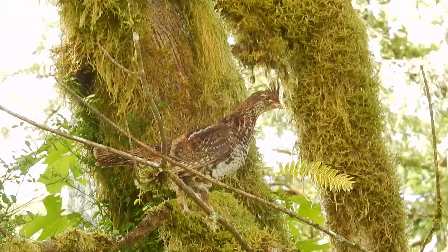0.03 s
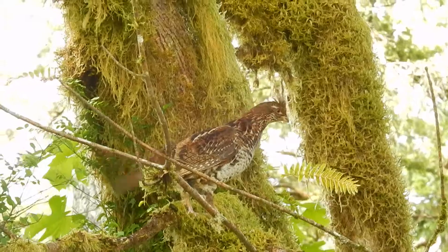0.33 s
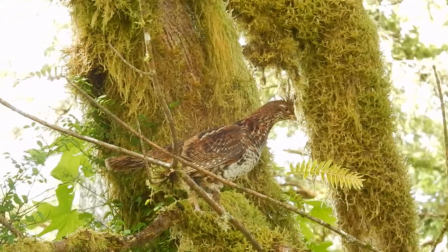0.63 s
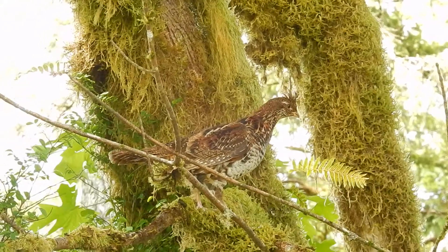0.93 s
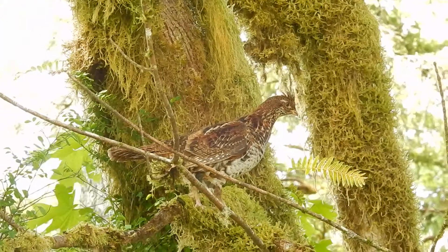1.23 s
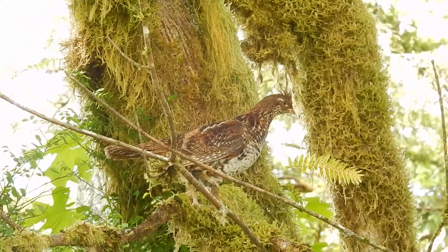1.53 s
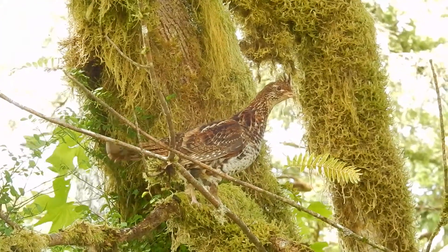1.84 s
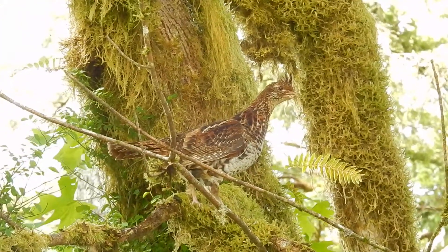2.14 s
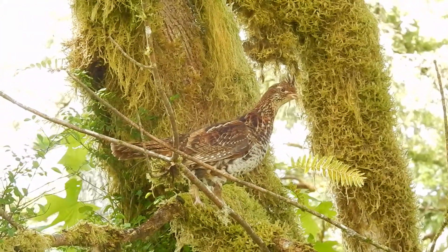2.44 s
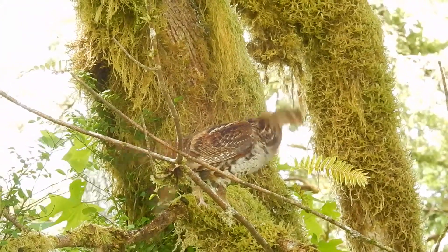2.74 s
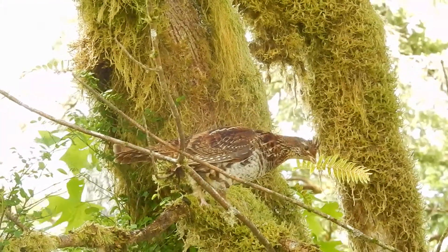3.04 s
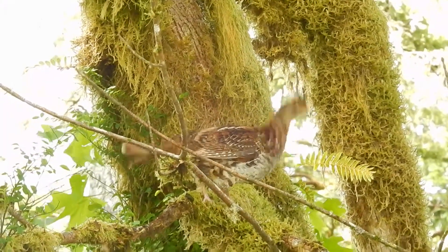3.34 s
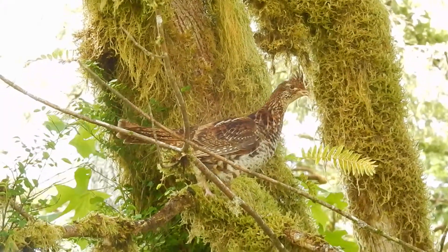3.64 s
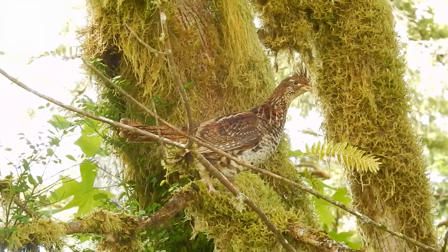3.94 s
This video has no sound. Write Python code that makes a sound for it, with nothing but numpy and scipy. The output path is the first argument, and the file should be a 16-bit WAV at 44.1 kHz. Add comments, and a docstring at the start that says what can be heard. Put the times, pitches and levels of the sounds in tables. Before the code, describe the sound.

Faint, slightly hoarse clucking from a grouse, with droning rumble and forest air underneath.

```python
"""A grouse perched in a mossy forest, left of a stereo microphone, gives twelve short, low clucks.
Each is a quick upward slide through the throat's resonances that turns hoarse and echoes off near trunks.
Something small snaps once close by, foliage rustles and a far songbird adds a few thin notes.
Under it lie a steady droning rumble and the hiss of the forest air, also mostly from the left."""
import sys
import numpy as np
from scipy import signal
from scipy.fft import rfft, irfft
from scipy.io import wavfile

SR = 44100
rng = np.random.default_rng(int(sys.argv[2]) if len(sys.argv) > 2 else 0)


def to_wav(sig):
    """Store sig (one row per channel, or 1-D mono) as 16-bit WAV at the path in sys.argv[1].

    Samples outside -1..1 are clipped; the rate is SR.
    """
    pcm = np.clip(np.atleast_2d(sig), -1, 1) * 32767
    pcm = np.round(pcm).astype(np.int16)
    wavfile.write(sys.argv[1], SR, pcm.T)  # frames by channels


N = 176400
TIME = np.arange(N) / SR
HZ = np.maximum(np.arange(N // 2 + 1) * SR / N, 1)

# The background's lean at the microphone. Each row: frequency in Hz, left minus right in dB.
LEFT_LEAN = [(60, 7), (110, 4.5), (200, 5.5), (380, 6.5), (700, 10.5), (1290, 11.0), (2380, 13), (4400, 5),
             (8120, 1), (15000, 0.5)]


def from_db(db):
    """Decibels to gain."""
    return 10 ** (np.asarray(db) / 20)


def rms_one(x):
    """Scale to rms 1."""
    return x / np.sqrt(np.mean(x ** 2) + 1e-20)


def at_hz(points, hz):
    """Read a table on a log-frequency axis."""
    freqs, values = np.transpose(points)
    return np.interp(np.log(hz), np.log(freqs), values)


def pan(left_db):
    """Left and right gains whose mean is 1, the left louder by left_db."""
    ratio = from_db(np.atleast_1d(left_db))
    return 2 * np.array([ratio, np.ones_like(ratio)]) / (1 + ratio)


def noise(gain, channels=1):
    """Noise shaped by a gain at each frequency; rms 1."""
    return rms_one(irfft(rfft(rng.standard_normal((channels, N))) * gain, N))


def coloured(points, channels=1):
    """Noise that follows a table of Hz and dB; rms 1."""
    return noise(from_db(at_hz(points, HZ)), channels)


def drift(rate_hz):
    """Random motion of spread 1, mostly slower than rate_hz."""
    return noise(1 / (1 + (HZ / rate_hz) ** 2))[0]


def swell(start, length):
    """A smooth rise and fall."""
    return np.sin(np.pi * np.clip((TIME - start) / length, 0, 1))


def decay(start, t60):
    """A sudden onset that falls 60 dB in t60 seconds."""
    return (TIME >= start) * from_db(-60 * np.clip((TIME - start) / t60, 0, 10))


def forest_air():
    """Steady rumble and hiss all around, alike on both sides in the bass and wide in the treble."""
    # Spectrum of the rumble and hiss. Each row: frequency in Hz, relative level in dB.
    colour = [(20, -6), (35, -19), (48, -9.5), (85, -6), (145, -7.5), (230, -4.5), (300, -5.5), (390, -12),
              (435, -16.5), (500, -15.5), (660, -17), (1000, -22), (1300, -29), (2030, -29.5), (2460, -35),
              (3100, -36.5), (4500, -42), (5500, -47), (8200, -49.5), (9400, -51), (10200, -52),
              (13200, -56.5), (15500, -58.5)]
    # Narrow dips in the background hiss; the one near 2.5 kHz is the microphone's colour.
    # Each row: centre in Hz, width in Hz, depth from 0 to 1.
    notches = [(1738, 37, 0.76), (2487, 96, 0.76)]
    # Likeness of the two sides. Each row: frequency in Hz, left-right correlation.
    likeness = [(30, 0.61), (130, 1), (290, 0.84), (640, 0.75), (1400, .55), (3100, 0.1), (7000, 0.051),
                (15000, 0.079)]
    gain = from_db(at_hz(colour, HZ)) * pan(at_hz(LEFT_LEAN, HZ))
    for hz, width, depth in notches:
        gain *= 1 - depth / (1 + (2 * (HZ - hz) / width) ** 2)
    mid, side = rfft(rng.standard_normal((2, N)))
    alike = at_hz(likeness, HZ)
    spread = np.sqrt((1 - alike) / (1 + alike))
    air = irfft(gain * (mid + spread * side * [[1], [-1]]), N)
    return from_db(-38) * air / air.mean(0).std()


def drone():
    """Wavering tones among narrow rumbling resonances, like a far engine."""
    # Humming tones. Each row: pitch in Hz, level in dB.
    tones = [(35.2, -50.5), (69.8, -48.5), (106.8, -49), (124.6, -41.5), (214, -46), (322.6, -50),
             (774, -67)]
    # Narrow bands of rumble. Each row: centre in Hz, half-width in Hz, level in dB.
    resonances = [(55, 6, -49), (72.3, 3.9, -50), (200.5, 3.1, -49.5), (213.5, 7.2, -52),
                  (253.3, 9.9, -50.5), (318, 9.8, -54.5), (375.4, 13.6, -52), (549.5, 8, -63),
                  (1152, 4.7, -66.5), (1393, 7.8, -70)]
    wander_hz, waver_db = 1.086, 2
    out = np.zeros((2, N))
    for hz, db in tones:
        phase = 2 * np.pi * (np.cumsum(hz + wander_hz * drift(3.8)) / SR + rng.random())
        level = from_db(db + waver_db * drift(4.9))
        out += level * np.sqrt(2) * np.sin(phase) * pan(at_hz(LEFT_LEAN, hz))
    for hz, width, db in resonances:
        band = noise(1 / (1 + ((HZ - hz) / width) ** 2))
        out += from_db(db) * band * pan(at_hz(LEFT_LEAN, hz))
    return out


def ease_bass(bed):
    """The background's deep bass eases off past halfway, then comes back."""
    # Course of the deep bass. Each row: time in seconds, gain in dB.
    course = [(.1, 1), (.7, 2), (1.4, 1.5), (1.7, 0), (2.5, -2.5), (4, 1.5)]
    corner_hz = 85
    deep = irfft(rfft(bed) / (1 + (HZ / corner_hz) ** 8), N)
    gain = from_db(np.interp(TIME, *np.transpose(course)))
    return bed + (gain - 1) * deep


def songbird():
    """Thin, slightly unsteady notes from far off in the forest."""
    # The notes. Each row: start in seconds, length in seconds, pitch in Hz, level in dB.
    peeps = [(1.12, .07, 4520, -67), (1.29, .11, 4500, -67), (1.49, .1, 4480, -65.5),
             (1.37, .06, 8650, -66), (1.675, .05, 8600, -65), (1.75, .08, 6400, -68),
             (2.94, .05, 8800, -67), (3.37, .04, 8900, -65)]
    phase_per_hz = 2 * np.pi * np.cumsum(1 + .009 * drift(rate_hz=120)) / SR
    return sum(from_db(db) * swell(start, length) * np.sin(hz * phase_per_hz)
               for start, length, hz, db in peeps)


def foliage():
    """Soft, high brushes of moss and leaves."""
    # The brushes. Each row: start in seconds, length in seconds, level in dB.
    rustles = [(.59, .14, -68), (3.19, .15, -69)]
    # Their colour. Each row: frequency in Hz, relative level in dB.
    colour = [(3000, -14), (6000, -2), (11000, 0), (15500, -9)]
    envelope = sum(from_db(db) * swell(start, length) for start, length, db in rustles)
    return envelope * coloured(colour, channels=2)


def snap():
    """One dry crack close by, near the centre, with a little splintering and a brief woody ring."""
    # Colour of crack and splinters. Each row: frequency in Hz, relative level in dB.
    colour = [(400, 4), (1200, 4), (2700, -1), (5000, 0.5), (5800, -3.5), (7500, -2), (9000, -13),
              (10300, -4.5), (13000, -12), (15500, -19)]
    # The woody ring. Each row: frequency in Hz, level in dB, seconds to fall 60 dB.
    modes = [(554, -34, .025), (920, -32.5, 0.024), (1500, -32.5, 0.013), (1780, -32, 0.022),
             (2730, -41, 0.018)]
    start = .9346
    lag_cycles = HZ * start + 3 * np.log(HZ + 300)  # the lows trail the highs
    crack = irfft(from_db(at_hz(colour, HZ) - 9.5) * np.exp(-2j * np.pi * lag_cycles), N)
    envelope = from_db(-35) * decay(start, t60=.0093) + from_db(-48) * decay(start, t60=.044)
    splinters = envelope * coloured(colour, channels=2)
    ring = sum(from_db(db) * decay(start, t60) * np.sin(2 * np.pi * hz * (TIME - start))
               for hz, db, t60 in modes)
    return np.array([crack, np.roll(crack, 1)]) + splinters + ring * pan(left_db=6)


def among_trees(call):
    """A call reaches the microphone directly, off two near trunks and as a short scattered tail."""
    # Echoes off the trunks. Each row: delay in seconds, level against the call in dB.
    trunks = [(.009, -13), (.033, -15)]
    echoes = sum(from_db(db) * np.interp(TIME - lag, TIME, call, left=0) for lag, db in trunks)
    scatter = rms_one(rng.standard_normal((2, N)) * decay(.019, t60=.11)) / np.sqrt(N)
    tail = signal.fftconvolve(call[None], scatter, axes=1)[:, :N]
    return call + echoes + from_db(-14.5) * tail


def grouse():
    """Each cluck is a harmonic note sliding up through the throat's resonances, clean, then hoarse."""
    # The clucks. Each row: start in seconds, level in dB, starting pitch in Hz, top pitch in Hz,
    # length in seconds, hoarseness from 0 to 1.
    clucks = [(0.276, -42, 422, 473, 0.029, .35), (.533, -42.5, 426, 474, 0.027, .4),
              (.773, -43.5, 393, 529, 0.032, 0.54), (1.646, -43.5, 419, 540, 0.029, 0.5),
              (1.873, -38.5, 410, 621, 0.033, .6), (2.193, -38, 399, 630, .036, 0.62),
              (2.431, -39.5, 396, 626, 0.0366, 0.63), (2.733, -40.5, 400.5, 612, 0.038, 0.53),
              (2.92, -42, 412, 597, 0.0353, 0.53), (3.337, -41, 405.5, 541, 0.037, 0.63),
              (3.716, -44.5, 389.4, 588, 0.037, 0.45), (3.943, -39.5, 403, 628, 0.036, 0.48)]
    # Resonances of the throat. Each row: frequency in Hz, relative level in dB.
    throat = [(300, -13.5), (550, 0.5), (750, -0.5), (1000, -2.5), (1200, -5.5), (1400, 2.5), (1750, -5.5),
              (2000, -7.5), (2400, -40), (3200, -31), (5000, -52)]
    # Colour of the clucks' airy edge. Each row: frequency in Hz, relative level in dB.
    breath_colour = [(2500, -13), (3800, 1), (5500, 6), (7200, -1), (8200, 5), (9000, -6), (11500, -5),
                     (13000, -2), (14000, -13), (15500, -19)]
    attack_s, release_s, slide_share, jitter = .014, .009, .95, .055
    voice, breath_level = np.zeros(N), np.zeros(N)
    wobble, rasp = drift(rate_hz=230), coloured(throat)[0]
    harmonics = np.arange(1, 9)[:, None]
    for start, db, start_hz, top_hz, length, hoarse in clucks:
        on = (TIME >= start) & (TIME < start + length + release_s)
        t = TIME[on] - start
        slide = np.sin(np.pi / 2 * np.clip(t / (length * slide_share), 0, 1) ** 1.263)
        rough = hoarse * np.clip(2 * t / length, 0, 2) ** 1.72
        pitch = (start_hz + (top_hz - start_hz) * slide) * (1 + jitter * rough * wobble[on])
        phase = 2 * np.pi * (np.cumsum(pitch) / SR + rng.random())
        partials = from_db(at_hz(throat, harmonics * pitch)) * np.sin(harmonics * phase)
        cluck = rms_one(rms_one(partials.sum(0)) + from_db(-5) * rough * rasp[on])
        attack = np.clip(t / attack_s, 0, 1)
        release = np.clip((length + release_s - t) / (2 * release_s), 0, 1)
        voice[on] += from_db(db) * attack * release * cluck
        breath_level += from_db(db - 18) * hoarse * swell(start, length=.056)
    breath = breath_level * coloured(breath_colour, channels=2)
    return among_trees(voice) * pan(left_db=18.5) + breath * pan(left_db=4)


def scene():
    """The grouse and the small sounds, near and far, over the forest's steady background."""
    return grouse() + snap() + songbird() + foliage() + ease_bass(drone() + forest_air())


def record(dry):
    """The microphone opens after a moment of silence; its left side lags a little, the top is cut."""
    left_lag_samples, open_s, fade_s, cutoff_hz = 2, .088, .012, 15700
    stereo = np.array([np.roll(dry[0], left_lag_samples), dry[1]])
    fade_in = np.clip((TIME - open_s) / fade_s, 0, 1)
    lowpass = signal.ellip(12, .1, 70, cutoff_hz, fs=SR, output="sos")
    return signal.sosfilt(lowpass, stereo * fade_in)


dry = scene()
out = record(dry)
to_wav(out)
```